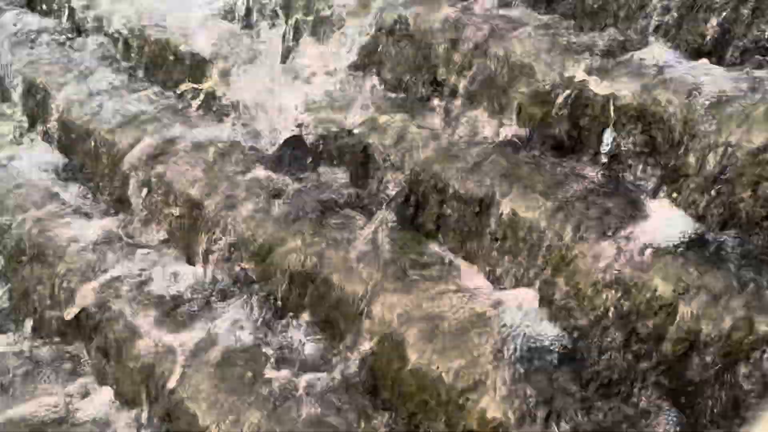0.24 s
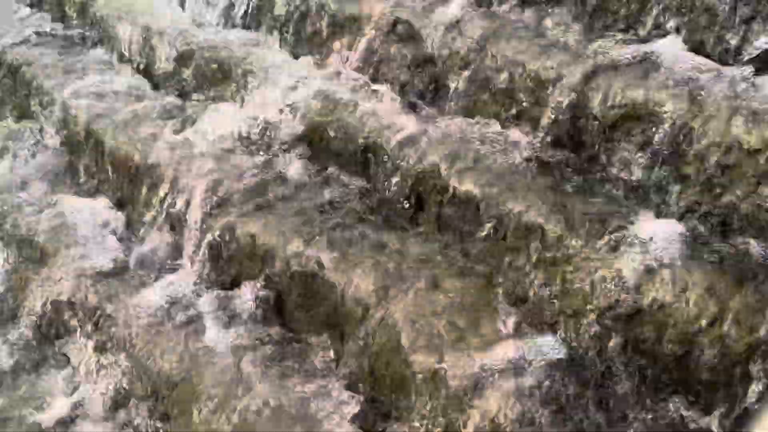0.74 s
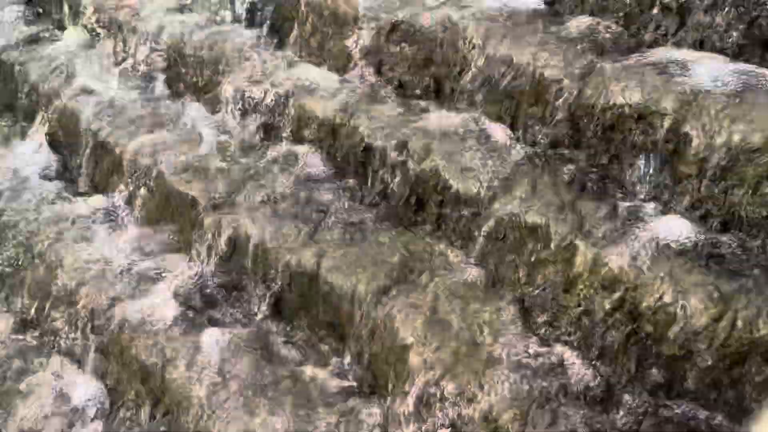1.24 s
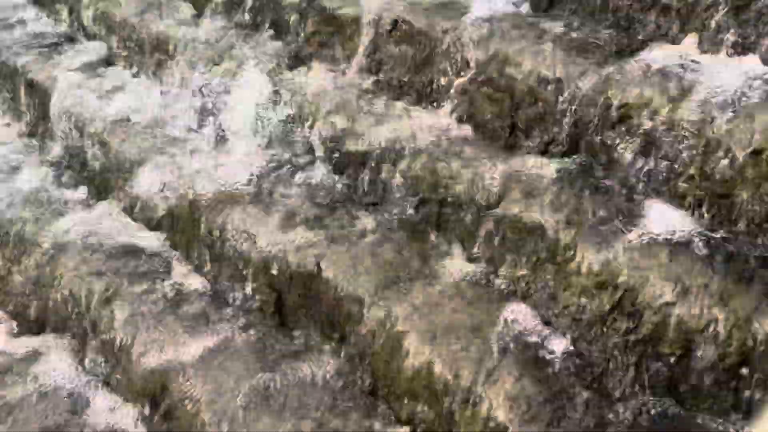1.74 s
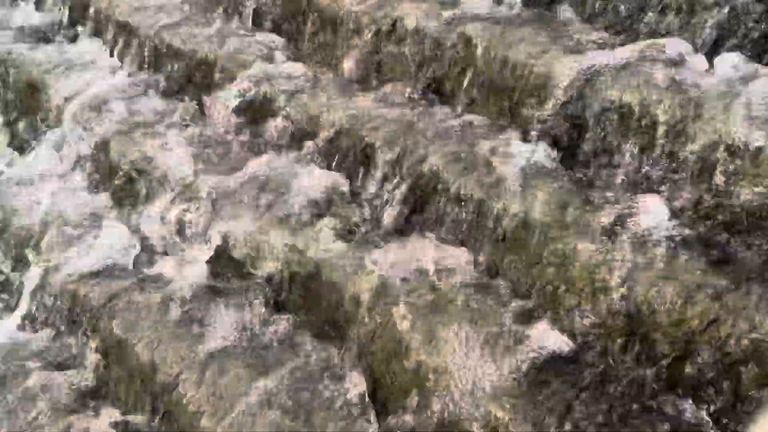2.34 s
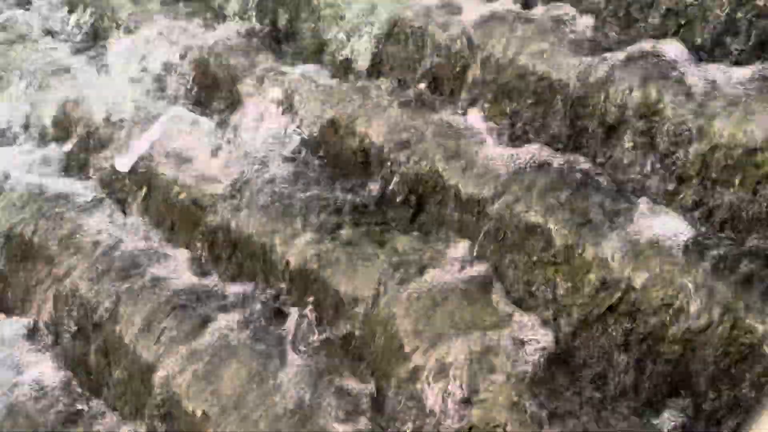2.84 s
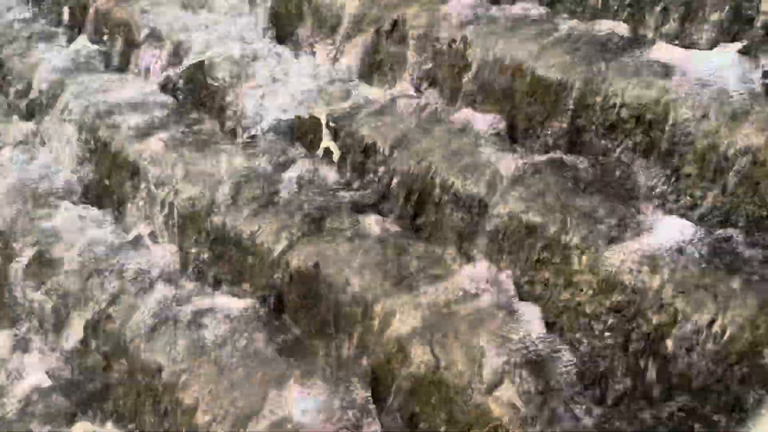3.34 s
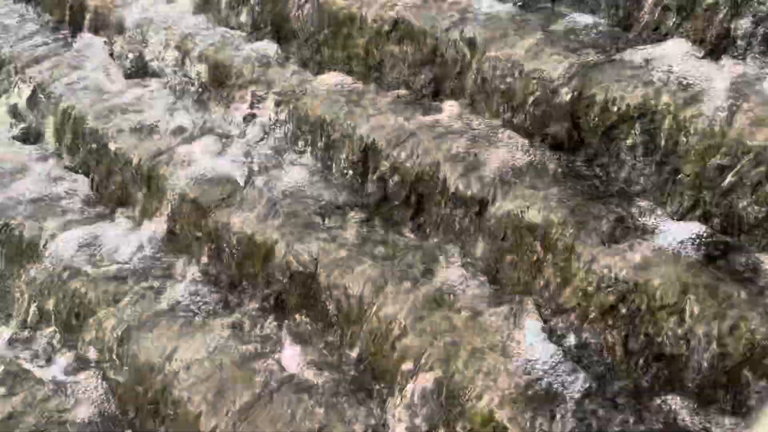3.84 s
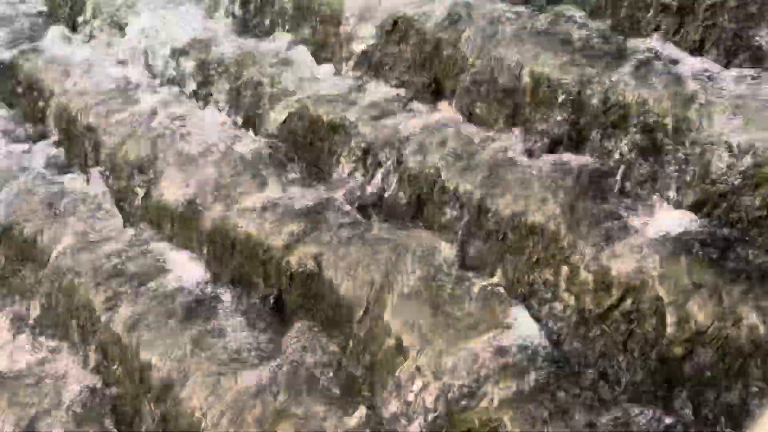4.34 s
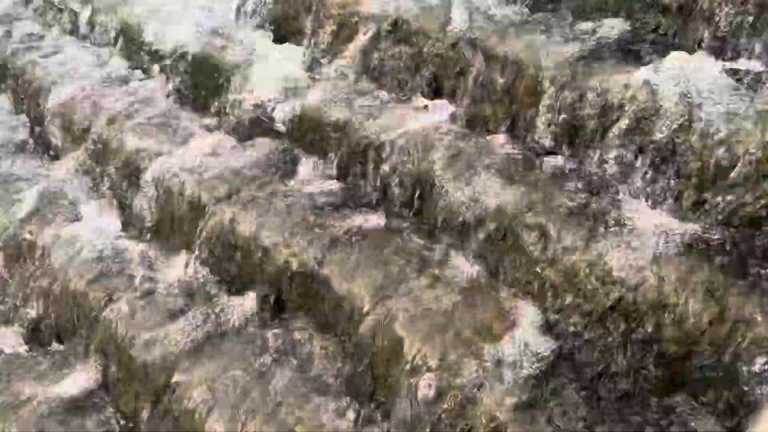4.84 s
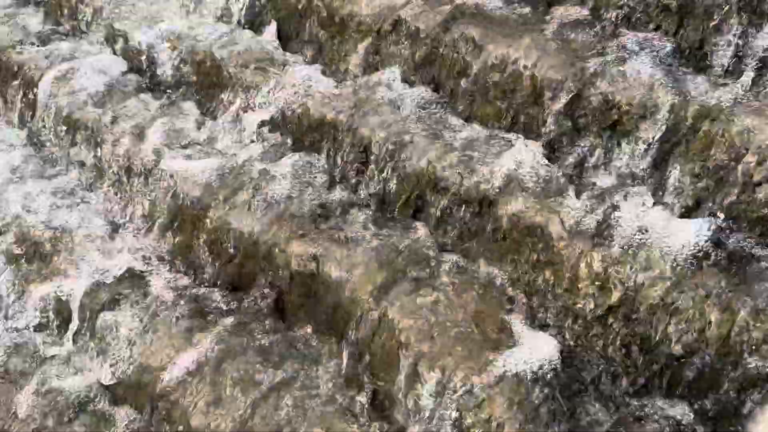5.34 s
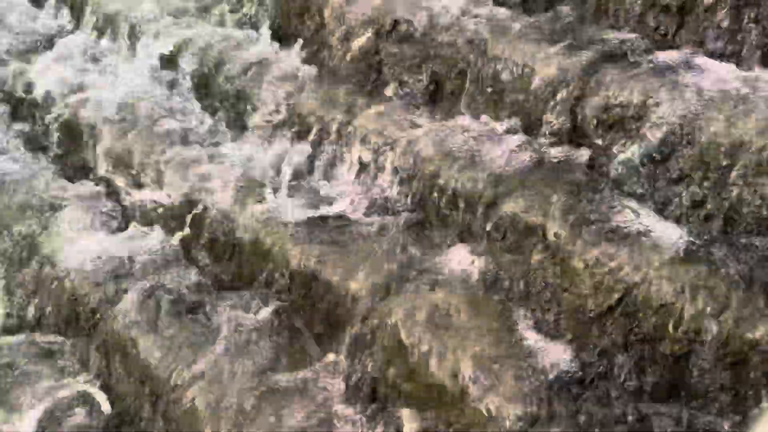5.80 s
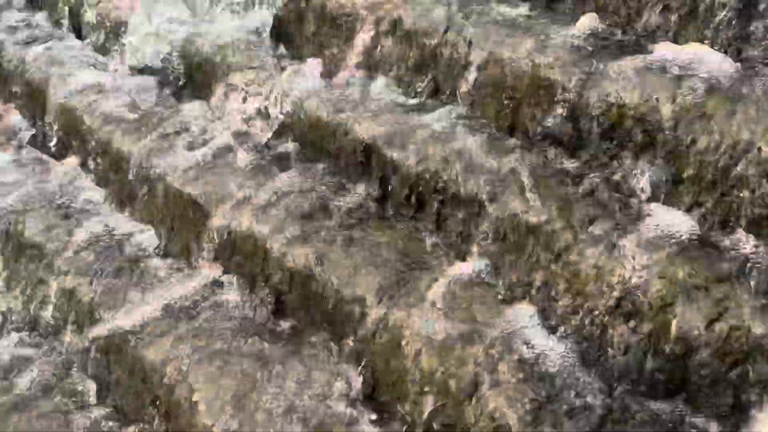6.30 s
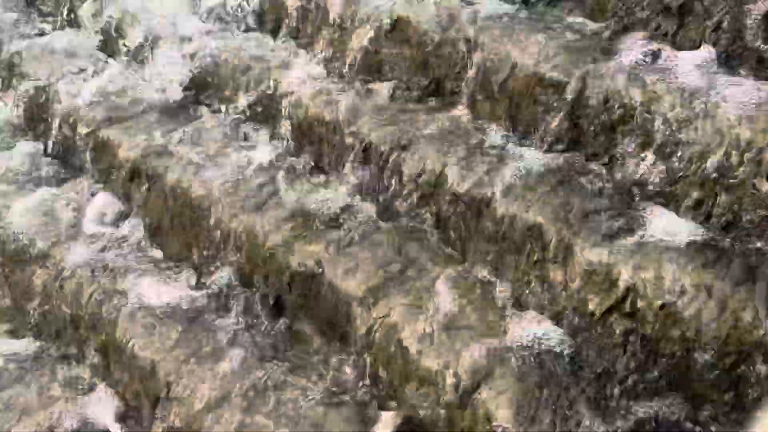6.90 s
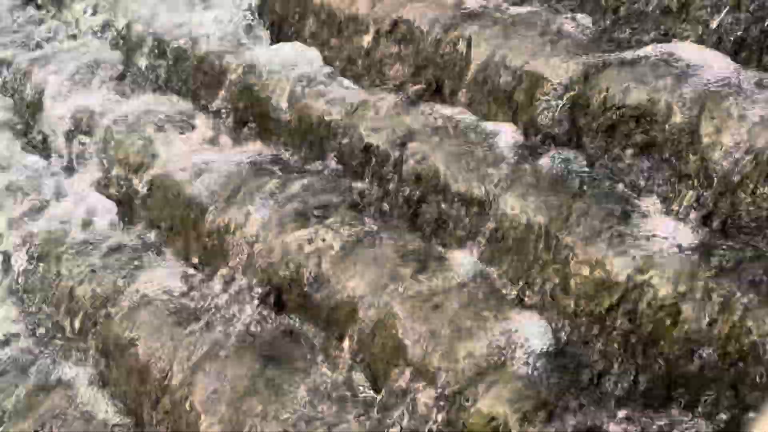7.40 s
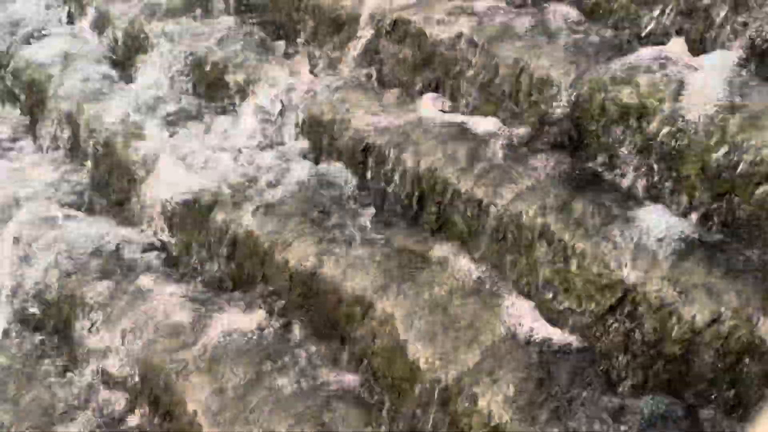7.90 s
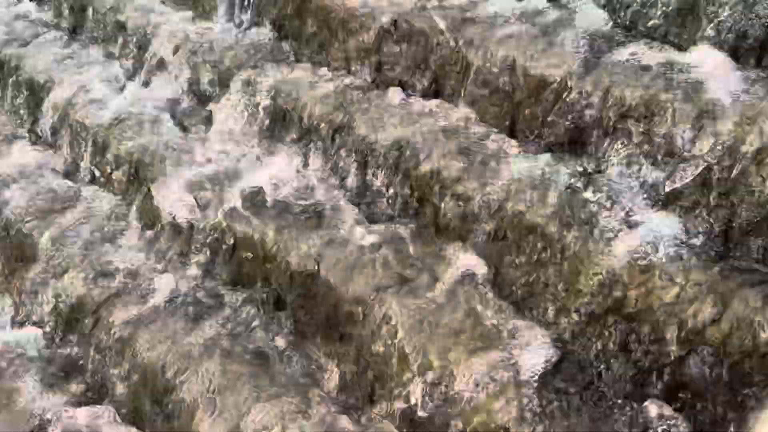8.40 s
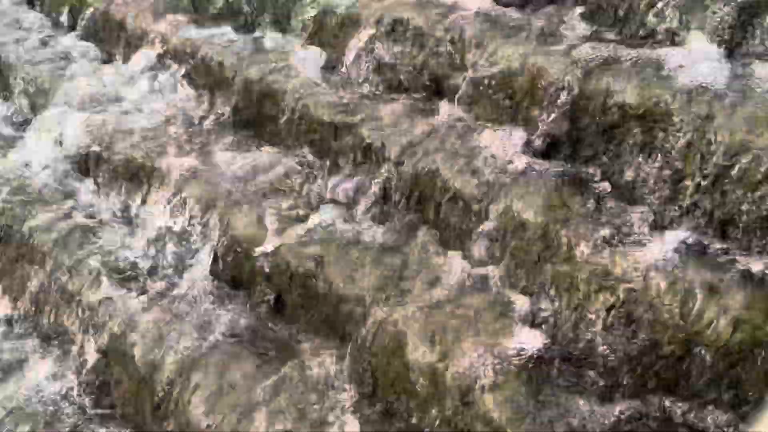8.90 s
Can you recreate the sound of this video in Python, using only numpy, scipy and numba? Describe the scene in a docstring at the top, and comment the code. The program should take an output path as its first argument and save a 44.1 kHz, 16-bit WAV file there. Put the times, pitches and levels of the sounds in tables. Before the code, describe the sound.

Continuous close rush of water tumbling down rocky steps, bubbly mid-range gurgle, crisp hiss of foam, tiny drop ticks and soft wind thumps.

```python
"""Stream over stone ledges

A shallow stream tumbles over rows of mossy stone ledges, close to a handheld two-port microphone.
Trapped air rings as swarms of damped sines over a steady rush of coloured noise, with larger glugs.
Spray fizzes as tiny bubbles over a patchy hiss, and single drops snap nearby.
A light breeze buffets the ports as low noise with sudden puffs."""
import sys
import numpy as np
from scipy import signal
from scipy.fft import rfft, irfft, next_fast_len
from scipy.io import wavfile
from scipy.ndimage import uniform_filter1d, map_coordinates
from numba import njit

SR = 44100
rng = np.random.default_rng(int(sys.argv[2]) if len(sys.argv) > 2 else 0)


def transcribe(signal):
    """Save signal, clipped to [-1, 1], as a 16-bit WAV file at the path in sys.argv[1]."""
    frames = np.atleast_2d(signal).T
    limited = np.clip(frames, -1, 1)
    pcm = np.round(limited * 32767).astype(np.int16)
    wavfile.write(sys.argv[1], SR, pcm)


def decibels_to_gain(level_db):
    """Convert a level in decibels to a linear amplitude gain (20 dB per decade)."""
    exponent = np.asarray(level_db, float) / 20
    return 10 ** exponent


N = 403515  # length in samples

# Colour of the gurgle. Each row: frequency in Hz, relative level in dB per Hz.
GURGLE_COLOUR = [(82, -35), (140, -7.5), (178, -18), (329, 0), (455, 0), (775, -4.5), (1480, -6),
                 (1850, -8.5), (4000, -17.5), (5200, -27), (8800, -120)]
# Largest bubbles. Each row: time of the swell's peak in seconds, relative level in dB,
# starting pitch in Hz.
GLUG_EVENTS = [(0.248, -19, 1100), (0.882, -18.5, 1300), (1.211, -20, 1530), (1.26, -24, 229),
               (1.448, -19, 1050), (2.091, -18, 1480), (2.985, -24.5, 260), (3.138, -19, 1510),
               (3.858, -22.5, 330), (4.34, -20, 680), (4.565, -28, 214), (4.64, -18, 526),
               (4.756, -29, 235), (4.844, -31, 210), (5.01, -27, 310), (5.15, -17, 1090),
               (5.152, -18, 1700), (5.356, -26.5, 265), (5.706, -23, 262), (5.861, -27, 256),
               (6.675, -19, 600), (6.683, -24, 252), (7.525, -26, 230), (7.546, -19.5, 464),
               (7.968, -16.5, 480), (8.207, -17, 1340), (8.208, -18, 650), (8.243, -17.5, 380),
               (8.73, -30, 220), (8.758, -17.5, 1440), (8.932, -19, 1400)]
# Colour of the spray. Each row: frequency in Hz, relative level in dB per Hz.
SPRAY_COLOUR = [(1500, -6), (3500, -2.5), (5000, -1.5), (7000, -3), (9000, 0), (10700, 3), (12000, -1),
                (14000, 0.5), (15700, -4.5)]
# Nearest drops snapping. Each row: time of the swell's peak in seconds, relative level in dB,
# starting pitch in Hz.
DROP_EVENTS = [(0.441, -9, 10590), (0.690, -6, 12400), (1.345, -17, 2440), (1.861, -19, 5660),
               (1.921, -16, 2340), (2.112, -3, 14580), (2.262, -12, 9500), (2.263, -7, 14400),
               (2.35, -11, 12500), (2.579, -16, 4820), (2.818, -14, 12420), (3.623, -9, 11930),
               (3.855, -7, 10100), (3.966, -8, 12420), (4.033, -23, 8000), (4.147, -11, 14580),
               (4.158, -20, 3760), (5.221, -8, 11020), (6.088, -20, 5660), (6.157, -5, 14580),
               (6.689, -19, 5890), (7.402, -3, 14580), (7.513, -8, 11020), (7.673, -21, 4110),
               (7.755, -15, 2080), (7.919, -15, 14580), (8.236, -15, 14580), (8.54, -20, 3950),
               (8.724, -9, 10170), (8.974, -11, 14580)]
# Strength of the breeze. Each row: time in seconds, relative buffet level in dB.
BREEZE_STRENGTH = [(0, -48), (.7, -41.5), (1.5, -46), (2.1, -38.5), (2.5, -38), (3.3, -35.5), (3.7, -40),
                   (4.35, -40), (4.6, -44), (5.6, -41), (6.4, -45), (6.7, -44.5), (7.7, -44), (9.15, -50)]
# Colour of the buffeting. Each row: frequency in Hz, relative level in dB per Hz.
BUFFET_COLOUR = [(12, -43.5), (20, -11), (41, 2.5), (59, 3), (92, -4.5), (178, -14.5), (200, -3),
                 (260, -38), (440, -120)]
# Sudden puffs on the ports. Each row: time of the swell's peak in seconds, relative level in dB,
# starting pitch in Hz.
PUFF_EVENTS = [(1.2, -35, 60), (1.88, -36, 60), (2.29, -32, 60), (2.378, -32, 127), (2.569, -24, 55),
               (2.741, -31, 72), (2.93, -28, 60), (3.07, -21, 89), (3.34, -36, 65), (3.77, -31, 55),
               (4.137, -25, 50), (4.41, -34, 70), (5.27, -33, 60), (5.76, -30, 60), (6.017, -23, 61),
               (6.02, -26, 120), (6.37, -29, 60)]
# How alike the water sounds at the two ports. Each row: frequency in Hz, likeness from 0 to 1.
PORT_LIKENESS = [(150, 0.96), (450, 0.84), (800, 0.59), (1400, 0.73), (1800, 0.17), (2300, 0.86),
                 (3000, 0.71), (4000, 0.4), (5300, 0.89), (6200, 1), (7000, 0.86), (7800, 1)]
# Balance of the ports. Each row: frequency in Hz, left over right in dB.
PORT_BALANCE = [(150, -.3), (500, 2), (1000, 3), (1400, 2), (2200, 5), (3000, 2.5), (4000, 3.3),
                (5300, 2.2), (6200, .4), (7000, 1.6), (7800, 0)]
# Phase between the ports. Each row: frequency in Hz, lead of the left in radians.
PORT_LEAD = [(150, 0.13), (500, 0.25), (1000, -0.25), (1700, -0.11), (2000, -1.56), (2700, -0.79),
             (3400, 0.49), (4500, -0.2), (6000, 0), (7000, -0.12), (8000, 0.41)]

GURGLE_DB, SPRAY_DB = -23.75, -27  # steady flow, rms ahead of the splashes and the ports
SPLASH_DEPTH_DB, SPLASH_KNOTS_PER_S = 0.69, 55  # quick level changes shared by gurgle and spray
LAG_FROM_HZ, LAG_S = 7960, 0.000325  # above this pitch the left side's phase falls behind
LOW_HZ, TOP_HZ = 38, 15860  # the microphone's band


def unit(x):
    """Scales to rms 1."""
    return x / np.sqrt(np.mean(x ** 2) + 1e-20)


def along(points, hz):
    """Reads (Hz, value) points on a log frequency axis."""
    point_hz, value = np.transpose(points)
    return np.interp(np.log(hz + 1), np.log(point_hz + 1), value)


def wobble(rate):
    """Two smooth random curves through rate knots a second."""
    knots = rng.standard_normal((2, int(N * rate / SR) + 4))
    position = np.arange(N) * rate / SR
    return np.array([map_coordinates(k, [position]) for k in knots])


@njit
def add_rings(out, start, step, gain, cycles, rise, sharp):
    """Adds damped sines with a soft start; a bubble nearing the surface climbs in pitch (rise > 0)."""
    for k in range(len(start)):
        life = cycles[k] / step[k]  # decay time in samples
        for i in range(min(int(4 * life), len(out) - start[k])):
            u = i / life
            turn = step[k] * i * (1 + rise * u / 2)
            swell = np.exp(-u) * (1 - np.exp(-sharp * u))
            out[start[k] + i] += gain[k] * swell * np.sin(2 * np.pi * turn)


def bubbles(spectrum, rate, lo_hz, hi_hz, cycles, spread_db, rise):
    """Two unrelated swarms of ringing bubbles, rate a second, levels following the spectrum, rms 1."""
    out = np.zeros((2, N))
    for side in out:
        when, size, luck = rng.random((int(rate * N / SR), 3)).T
        hz = lo_hz * (hi_hz / lo_hz) ** size
        luck_db = -spread_db * np.log(luck + 0.0026)  # with any spread, a few are far louder
        gain = hz * decibels_to_gain(along(spectrum, hz) + luck_db)
        start = (when * N).astype(np.int64)
        add_rings(side, start, hz / SR, gain, np.full(len(hz), cycles), rise, sharp=4.5)
    return unit(out)


def rush(spectrum, patchy_db):
    """Two unrelated coloured noises sharing patches of random gain in time and pitch, rms 1."""
    hz, _, z = signal.stft(rng.standard_normal((2, N + 1024)), SR, nperseg=1024)
    patches = uniform_filter1d(rng.standard_normal(z.shape[1:]), size=8, axis=0)
    patches = uniform_filter1d(patches, size=3, axis=1)
    z = z * decibels_to_gain(along(spectrum, hz)[:, None] + patchy_db * unit(patches))
    return unit(signal.istft(z, SR, nperseg=1024)[1][:, :N])


def strays(rate, level_db, lo_hz, hi_hz):
    """Event rows at random moments, rate a second, with random relative levels and pitches."""
    when, size, luck = rng.random((int(rate * N / SR), 3)).T
    s = 0.05 + when * (N / SR - 0.05)
    db = level_db + 7.0 * (luck - 0.5)
    return np.transpose([s, db, lo_hz * (hi_hz / lo_hz) ** size])


def single(rows, cycles, rise, lift_db, sharp):
    """Single swelling rings in one channel; lift_db raises the rows' levels."""
    out = np.zeros(N)
    s, db, hz = np.transpose(rows)
    swell_s = cycles / hz * np.log(1 + sharp) / sharp  # the rise before the peak
    start = ((s - swell_s) * SR).astype(np.int64)
    add_rings(out, start, hz / SR, decibels_to_gain(db + lift_db), np.full(len(s), cycles), rise, sharp)
    return out


def glugs():
    """Large bubbles swell and ring for a few cycles with a slight climb in pitch."""
    rows = [*GLUG_EVENTS, *strays(rate=7, level_db=-24, lo_hz=300, hi_hz=1802)]
    return single(rows, cycles=3.14, rise=0.035, lift_db=12.5, sharp=1.1)


def gurgle(level_db):
    """Pockets behind the ledges: clumps of ringing bubbles over the rush of the farther falls."""
    near = bubbles(GURGLE_COLOUR, rate=1200, lo_hz=181.1, hi_hz=2617, cycles=4.14,
                   spread_db=0.0, rise=0.051)
    clumps = decibels_to_gain(0.5 * wobble(35))
    far = rush(GURGLE_COLOUR, patchy_db=1.2)
    body = unit(decibels_to_gain(-2.6) * unit(clumps * near) + far)
    pair = decibels_to_gain(level_db) * body
    pair[0] += glugs()  # only in the part both ports share
    return pair


def drops():
    """Nearest drops snap as short, high rings with a slight climb in pitch."""
    rows = [*DROP_EVENTS, *strays(rate=2.5, level_db=-20.5, lo_hz=3500, hi_hz=15000)]
    return single(rows, cycles=1.64, rise=0.022, lift_db=11.0, sharp=1.9)


def spray(level_db):
    """Tiny bubbles bursting in the foam, in clumps, over a fluttering hiss."""
    fizz = bubbles(SPRAY_COLOUR, rate=6000, lo_hz=3520, hi_hz=16100, cycles=2.5,
                   spread_db=4.0, rise=0.037)
    clumps = decibels_to_gain(1.03 * wobble(35)[0] + 2.4 * wobble(90)[0])
    hiss = rush(SPRAY_COLOUR, patchy_db=1.5)
    body = unit(decibels_to_gain(-4.0) * unit(clumps * fizz) + hiss)
    pair = decibels_to_gain(level_db) * body
    pair[0] += drops()  # only in the part both ports share
    return pair


def puffs():
    """Sudden puffs thump the ports as heavily damped low rings that sag in pitch."""
    return single(PUFF_EVENTS, cycles=1.0, rise=-0.062, lift_db=17.0, sharp=0.76)


def breeze():
    """Low noise buffeting that follows the breeze, partly different at each port, plus puffs."""
    s, db = np.transpose(BREEZE_STRENGTH)
    strength = decibels_to_gain(np.interp(np.arange(N) / SR, s, db) + 2.4)
    flutter = decibels_to_gain(1.6 * wobble(9)[0])
    shared, own = strength * unit(flutter * rush(BUFFET_COLOUR, patchy_db=1.0))
    shared = shared + puffs()
    return np.array([shared + 0.41 * own, shared - 0.59 * own])


def stereo_lag(hz):
    """Phase in radians by which the left trails in the treble, bent into soft half-turn steps."""
    lag = 2 * np.pi * LAG_S * np.maximum(hz - LAG_FROM_HZ, 0)
    return lag - np.sin(2 * lag) / 2


def stereo_likeness(hz, lag):
    """Likeness of left and right; above LAG_FROM_HZ the stereo image widens and narrows with pitch."""
    alike = np.where(hz < LAG_FROM_HZ, along(PORT_LIKENESS, hz), 1)
    return np.clip(alike - 0.2 * np.sin(lag) ** 2, 0, 1)


def ports(pair):
    """Blends shared and unshared water sound into left and right, with a balance and phase by pitch."""
    m = next_fast_len(N + SR // 4)  # room for the filter's tail
    hz = np.fft.rfftfreq(m, 1 / SR)
    shared, own = rfft(pair, m)
    lag = stereo_lag(hz)
    mix_angle = np.arccos(stereo_likeness(hz, lag)) / 2
    phase = along(PORT_LEAD, hz) * (hz < LAG_FROM_HZ) - lag
    tilt = decibels_to_gain(along(PORT_BALANCE, hz) / 2) * np.exp(0.5j * phase)  # half to each side
    left = (np.cos(mix_angle) * shared + np.sin(mix_angle) * own) * tilt
    right = (np.cos(mix_angle) * shared - np.sin(mix_angle) * own) / tilt
    return irfft(np.array([left, right]), m)[:, :N]


def scene():
    """The stream through the ports, with the breeze on them."""
    splash_db = SPLASH_DEPTH_DB * wobble(SPLASH_KNOTS_PER_S)[0]
    water = gurgle(GURGLE_DB + splash_db) + spray(SPRAY_DB + splash_db)
    return ports(water) + breeze()


def low_pass(x):
    """Removes everything above the highest recorded frequency."""
    return signal.sosfilt(signal.butter(12, 16070, fs=SR, output="sos"), x)


def record(dry):
    """The microphone rolls off the deepest rumble and cuts the top sharply."""
    m = next_fast_len(N + SR // 4)
    hz = np.fft.rfftfreq(m, 1 / SR)
    band = (hz < TOP_HZ) / (1 + (LOW_HZ / (hz + 1e-3)) ** 4)
    mix = irfft(rfft(dry, m) * band, m)[:, :N]
    return low_pass(mix)


dry = scene()
out = record(dry)
transcribe(out)
```